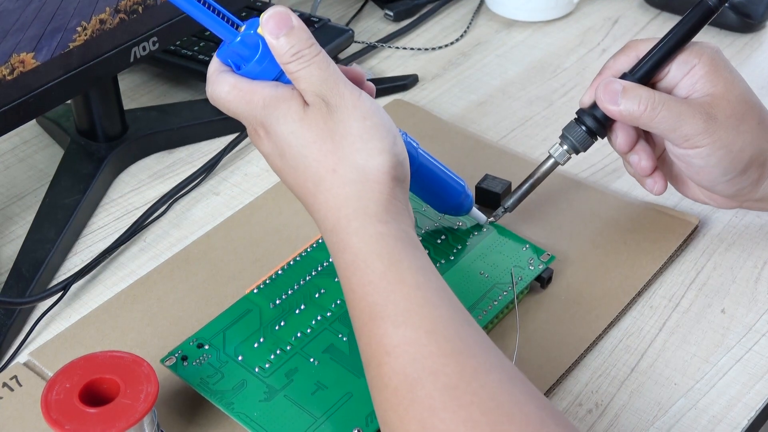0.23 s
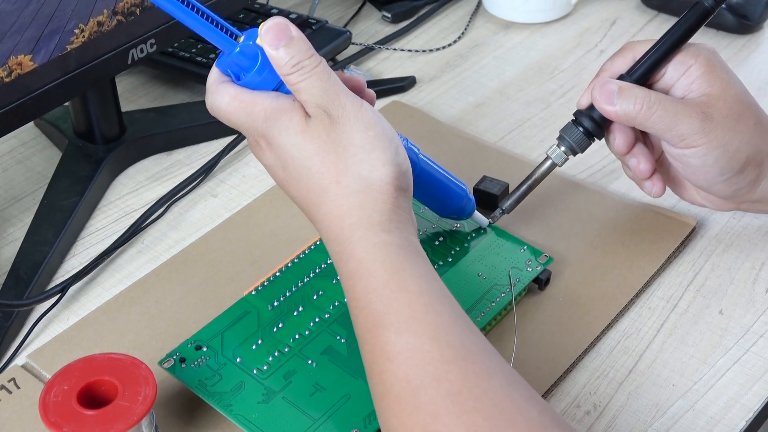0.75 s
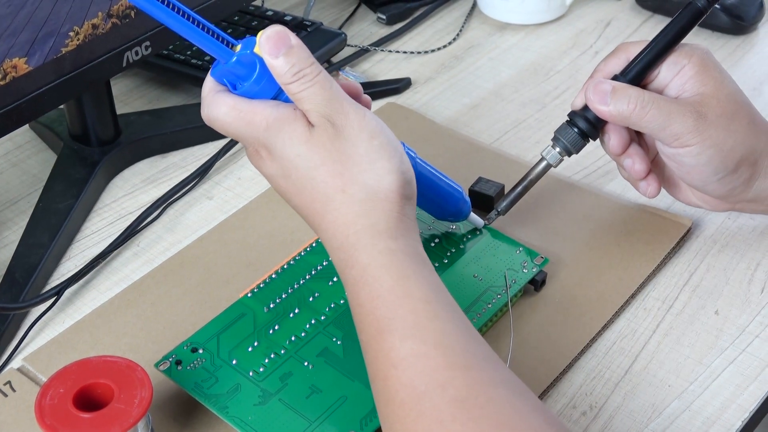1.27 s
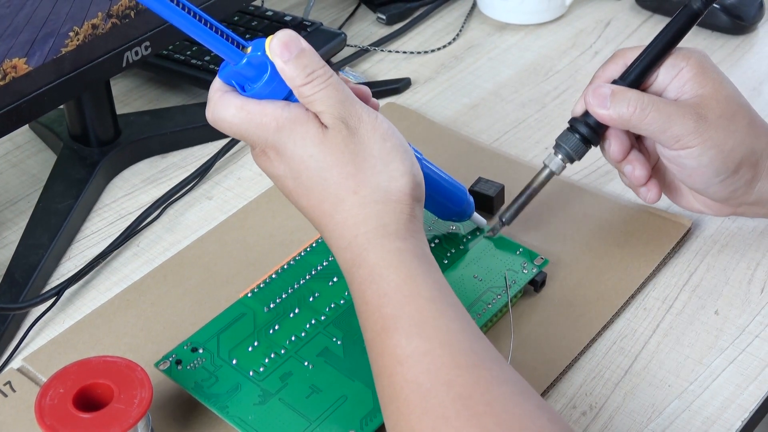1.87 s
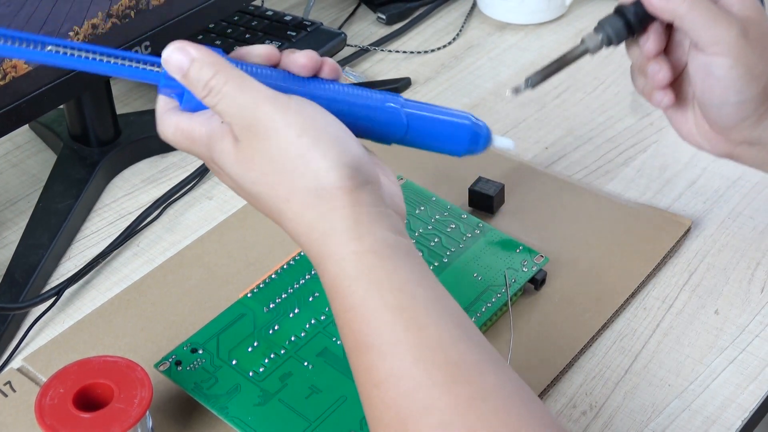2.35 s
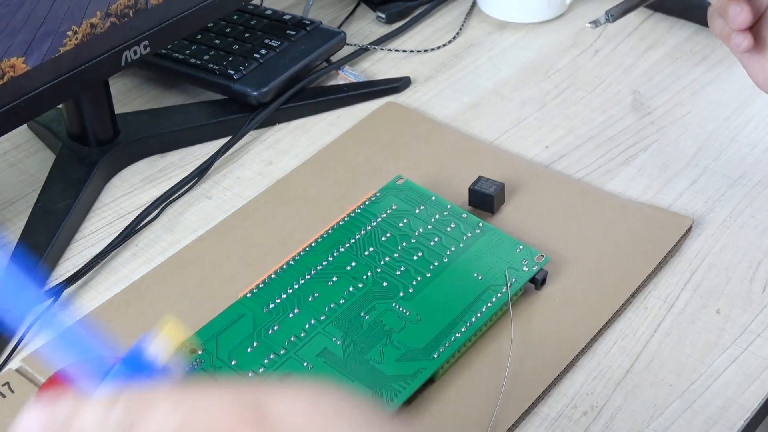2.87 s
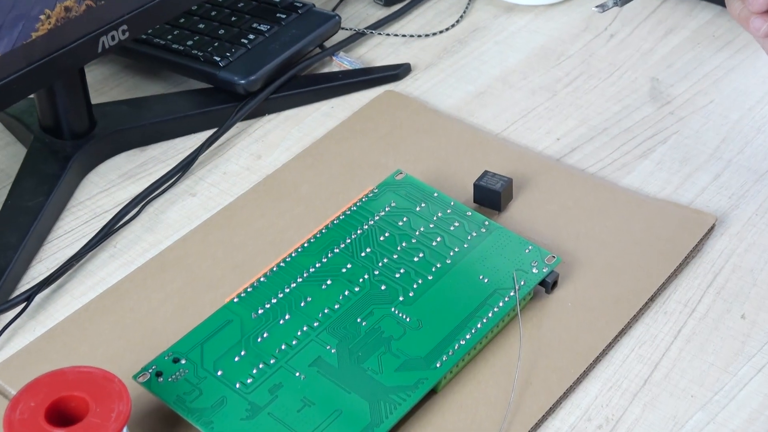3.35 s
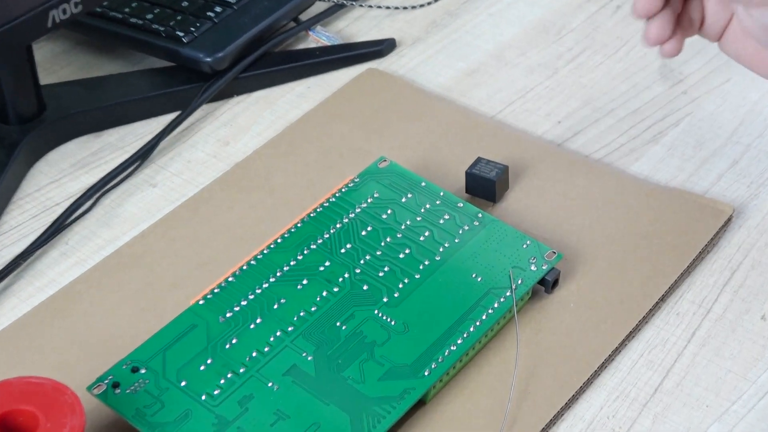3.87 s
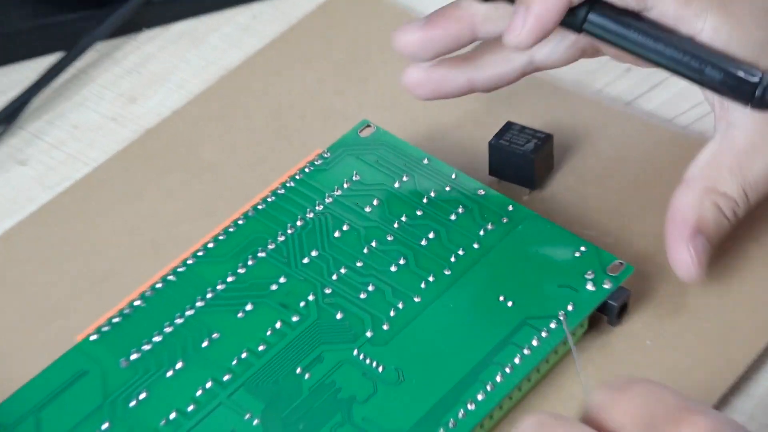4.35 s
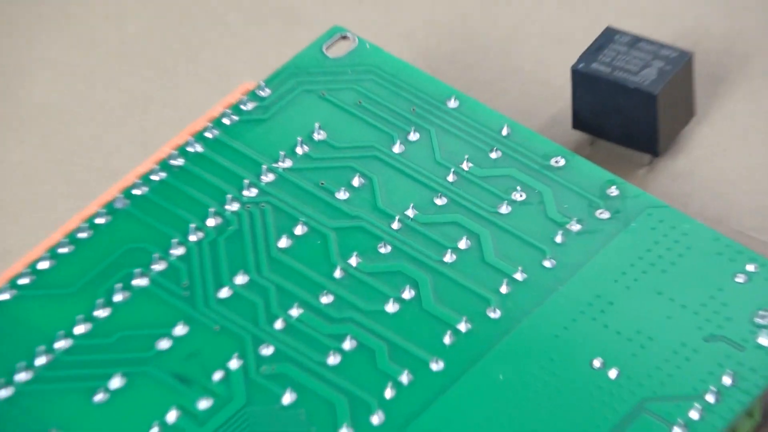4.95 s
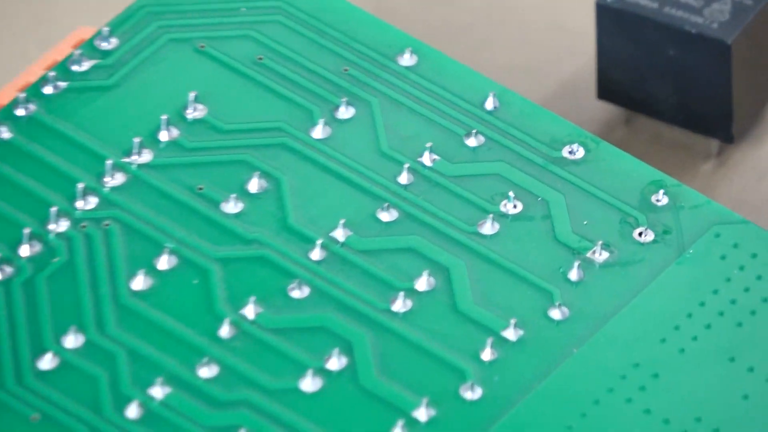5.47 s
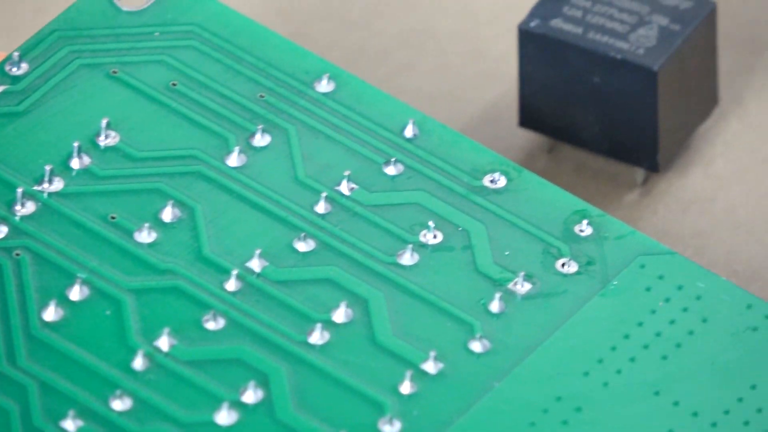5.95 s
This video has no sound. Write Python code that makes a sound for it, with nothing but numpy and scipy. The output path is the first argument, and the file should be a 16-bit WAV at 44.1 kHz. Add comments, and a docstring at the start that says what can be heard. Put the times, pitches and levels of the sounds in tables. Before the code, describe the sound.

A close microphone picks up a workbench in a small, slightly reflective room, with low rumbling air and wavering mains and fan hum throughout. Very soft rubbing passes around 0.3 seconds. At 1.67 a spring-loaded pump's trigger clicks, thin and bright; at 1.89 the plunger fires with a loud, hard snap, several impacts packed together, plastic and spring ringing briefly over a low bench thump. Only hum and a faint low rub near 2.9 follow, with a tiny tick at 3.2. From 3.65 to 4.0 plastic knocks bounce in tight clusters, hollow and woody, with a light jangle. Between 4.45 and 4.87 solder wire slides in a faint grainy hiss with thin squeals and snags, among ticks. Soft handling and small ticks continue. At 5.8 a dull tap precedes a metal tool landing at 5.88 and tipping over at 5.96, clattering briefly; faint rubbing and ticks finish.

```python
"""Desoldering pump on a bench

A spring-loaded pump clicks, then snaps on a circuit board, close by in a small room: noise rattles and struck modes.
It is laid down with bouncing plastic knocks, and a metal tool lands, tips over and clatters to rest.
Solder wire hisses across cardboard with combed noise, squeals and snags; ticks, thuds and soft rubbing join in.
Low bench resonances sway in filtered rumble, under air noise and wavering mains and fan tones."""
import sys
import numpy as np
from scipy import signal
from scipy.fft import rfft, irfft
from scipy.io import wavfile
from scipy.ndimage import uniform_filter1d, map_coordinates

SR = 44100
rng = np.random.default_rng(int(sys.argv[2]) if len(sys.argv) > 2 else 0)


def unload_audio(sound):
    """Save the sound as a 16-bit wav file, at the path given as the first command line argument."""
    columns = np.transpose(np.atleast_2d(sound))
    # keep every value between -1 and 1, then stretch to whole-number steps
    steps = np.round(np.clip(columns, -1, 1) * 32767)
    wavfile.write(sys.argv[1], SR, steps.astype(np.int16))


N = 274346
TIME = np.arange(N) / SR
AGE = TIME[:SR]  # time since a blow [s]

# plastic barrel and spring: (frequency [Hz], level [dB], t60 [s])
PUMP_MODES = [(314.8, -22, 0.38), (365, -15.5, .3), (418, -14.5, 0.19), (464, -12, 0.067),
              (800, -21.5, 0.16), (3617, -20.5, 0.082), (3726, -18, 0.11), (4260, -14.5, 0.0823),
              (6478, -18, .14), (7300, -21.5, .12), (7000, -18.5, .16), (7200, -20.5, .2)]
# plastic knocks on the bench:
# (time [s], level [dB], contact corner [Hz], rattle t60 [s], loss per bounce [dB])
BENCH_BLOWS = [(3.6516, -16.5, 2420, 0.052, 11), (3.689, -22, 2120, 0.046, 9),
               (3.8564, -15.5, 14000, 0.051, 18), (3.868, -16, 3620, 0.048, 5.5),
               (3.9654, -25.5, 1020, 0.074, 7)]
# one pull of the wire
SLIDE_START_S, SLIDE_LENGTH_S = 4.445, 0.42


def amp(db):
    """Decibels to gain."""
    return 10 ** (np.asarray(db) / 20)


def unit(x):
    """Scale to unit energy."""
    return x / np.sqrt(np.sum(x ** 2))


def fade(t60_s):
    """Exponential decay after a blow, 60 dB down at t60_s."""
    return np.exp(-np.log(1000) * AGE / t60_s)


def at(points, hz):
    """Read (Hz, value) points on a log-frequency axis."""
    point_hz, value = np.transpose(points)
    return np.interp(np.log(np.maximum(hz, 1)), np.log(point_hz), value)


def contact(hz, corner_hz):
    """Contact spectrum: a softer blow pushes for longer and loses treble above its corner."""
    return 1 / np.sqrt(1 + (hz / corner_hz) ** 4)


def colour(x, points, corner_hz=np.inf, size=4096):
    """Minimum-phase filter with a (Hz, dB) spectrum; white noise keeps its power."""
    hz = np.arange(size // 2 + 1) * SR / size
    gain = amp(at(points, hz)) * contact(hz, corner_hz)
    cepstrum = irfft(np.log(gain))
    # fold the cepstrum so that the filter is causal
    cepstrum[1:size // 2] *= 2
    cepstrum[size // 2 + 1:] = 0
    response = unit(irfft(np.exp(rfft(cepstrum))))
    return signal.fftconvolve(x, response)[:len(x)]


def hump(hz, skirt_db):
    """Broad spectrum around a centre, skirt_db down two octaves away."""
    below = [(hz / 16, 2 * skirt_db), (hz / 4, skirt_db), (hz / np.sqrt(2), -1)]
    above = [(hz * 4, skirt_db), (hz * 16, 3 * skirt_db)]
    return below + [(hz, 0)] + above


def burst(t60_s):
    """Dying noise rattle of tiny contacts: starts near rms 1, nearly even over frequency."""
    spectrum = rfft(rng.standard_normal(SR) * fade(t60_s))
    even = irfft(spectrum / np.abs(spectrum), SR) * (AGE < t60_s)
    return unit(even) * np.linalg.norm(fade(t60_s))


def tone(hz, t60_s):
    """One struck mode: a decaying sine."""
    return np.sin(2 * np.pi * hz * AGE) * fade(t60_s)


def add(out, start_s, x):
    """Mix x in at start_s."""
    i = int(start_s * SR)
    out[i:i + len(x)] += x[:N - i]


def walk(rate_hz):
    """Slow random drift with a spread near 1."""
    step = int(SR / rate_hz)
    held = np.repeat(rng.standard_normal(N // step + 1), step)
    return uniform_filter1d(held, step)[:N] * np.sqrt(3 / 2)


def line(hz, db, drift_rad=0.56):
    """A hum of rms level db whose phase wanders a little."""
    phase = 2 * np.pi * hz * TIME + drift_rad * walk(5)
    return np.sqrt(2) * amp(db) * np.sin(phase)


def struck(blows, spectrum, modes, ring_db):
    """Each blow rattles the body and rings its modes; harder contacts are brighter."""
    out = np.zeros(N)
    mode_hz, mode_db, _ = np.transpose(modes)
    shapes = np.array([(-1) ** k * unit(tone(hz, t60_s)) for k, (hz, _, t60_s) in enumerate(modes)])
    for start_s, db, corner_hz, t60_s in blows:
        mode_gain = amp(mode_db) * contact(mode_hz, corner_hz)
        ring = np.linalg.norm(fade(t60_s)) * mode_gain @ shapes
        rattle = colour(burst(t60_s), spectrum, corner_hz)
        add(out, start_s, amp(db) * (rattle + amp(ring_db) * ring))
    return out


def bouncing(blows, gap_s, count, shrink=.92, scatter=0.1201):
    """Each blow bounces on, losing level; gaps shrink on the whole, with random scatter."""
    k = np.arange(count)
    contacts = []
    for start_s, db, corner_hz, t60_s, loss_db in blows:
        gaps_s = gap_s * shrink ** k * (1 + scatter * rng.uniform(-0.992, 1, count))
        delays_s = np.cumsum(gaps_s) - gaps_s
        contacts += [(start_s + delays_s[j], db - loss_db * j, corner_hz, t60_s) for j in k]
    return contacts


def tick(db, hz, t60_s):
    """A small contact: a rattle through one broad resonance."""
    return amp(db) * colour(burst(t60_s), hump(hz, skirt_db=-19))


def pump_snap():
    """The plunger's release, flight and stop strike the barrel and spring."""
    # (time [s], level [dB], contact corner [Hz], rattle t60 [s])
    blows = [(1.8805, -30, 7000, 0.068), (1.887, -10, 14500, .065), (1.901, -10.5, 15000, 0.041),
             (1.906, -5.5, 18000, 0.018)]
    # rattle spectrum: (frequency [Hz], level [dB])
    spectrum = [(60, 6.5), (150, 5), (350, 4), (800, 1.5), (1400, 0.5), (2400, -2.5), (3900, 4),
                (5000, -2.5), (6800, 3), (9000, -1.5), (13000, -1), (16000, -5)]
    return struck(blows, spectrum, PUMP_MODES, ring_db=-14.5)


def trigger_click():
    """The trigger lets go of its catch and rings the same pump body."""
    # (time [s], level [dB], contact corner [Hz], rattle t60 [s])
    blows = [(1.6655, -28.5, 15070, 0.034), (1.6672, -12.5, 18170, 0.01), (1.6722, -29, 15000, 0.012)]
    # rattle spectrum: (frequency [Hz], level [dB])
    spectrum = [(100, 4.5), (400, -3), (820, 2.5), (1500, -7), (2600, -5), (3700, -1), (5000, -1),
                (6900, 4), (10000, -1.5), (16000, -4)]
    return struck(blows, spectrum, PUMP_MODES, ring_db=-15)


def bench_knocks():
    """Plastic bounces on the bench and rings its modes."""
    # rattle spectrum: (frequency [Hz], level [dB])
    spectrum = [(80, -5), (250, -6.5), (450, 4), (900, 0.5), (1400, 0.5), (1900, -6.5), (2800, -12),
                (3900, -11), (5300, -19), (9000, -18), (16000, -37)]
    # (frequency [Hz], level [dB], t60 [s])
    modes = [(436, -17, 0.5), (568, -14, .25), (674, -11, 0.16), (730, -13, 0.085), (839, -13.5, 0.18),
             (1076, -23.5, 0.19), (1276, -18.5, 0.25), (1800, -12, 0.066), (2100, -17, 0.18)]
    contacts = bouncing(BENCH_BLOWS, gap_s=.015, count=4)
    return struck(contacts, spectrum, modes, ring_db=-8)


def metal_clatter():
    """A metal tool lands, then tips over; each blow bounces and rings its modes."""
    # (time [s], level [dB], contact corner [Hz], rattle t60 [s], loss per bounce [dB])
    blows = [(5.8787, -17, 9000, 0.092, 3.5), (5.9622, -14.5, 950, 0.038, 16)]
    # rattle spectrum: (frequency [Hz], level [dB])
    spectrum = [(100, 1.5), (350, -11.5), (540, 9), (700, -6), (900, 5), (1250, -9), (2200, -4.5),
                (3500, -15), (4500, -25.5), (5500, -26), (9000, -21.5), (16000, -30)]
    # (frequency [Hz], level [dB], t60 [s])
    modes = [(473, -12, .2), (522, -6, .25), (572, -4, .25), (798, -11, .2), (871, -4, .3), (930, -9, .22),
             (1545, -8, .22), (2213, -19, .3), (2417, -19, .3), (2584, -17, .22), (2682, -16, .3),
             (3246, -19, .2), (3655, -16, .3), (3741, -21, .3), (4404, -16, .09), (4450, -18, .08),
             (5335, -27, .22), (7687, -30, .2), (9141, -30, .25)]
    contacts = bouncing(blows, gap_s=.017, count=5)
    return struck(contacts, spectrum, modes, ring_db=-5.5)


def thuds():
    """Single damped notes of struck surfaces, each eased in over half a cycle."""
    # (time [s], frequency [Hz], level before decay [dB], t60 [s])
    notes = [(1.8912, 810, -0.5, 0.011), (1.892, 99, -12, 0.093), (3.6508, 1000, -3.5, 0.0069),
             (3.694, 435.4, -27, 0.36), (4.472, 944, -19.5, 0.029), (4.834, 3990, -30.5, 0.0076),
             (5.418, 2710, -42.5, 0.19), (5.8035, 142, 0.5, 0.012)]
    out = np.zeros(N)
    for start_s, hz, db, t60_s in notes:
        push = np.sin(np.pi * np.minimum(hz * AGE, .5))
        add(out, start_s, amp(db) * push * tone(hz, t60_s))
    return out


def ticks():
    """Light contacts of plastic, wire and tools, and loose parts jangling after the first knock."""
    # (time [s], level [dB], centre [Hz], t60 [s])
    contacts = [(3.2128, -43.5, 7000, 0.034), (4.3312, -40, 7300, 0.019), (4.4627, -37, 6500, .018),
                (4.489, -29, 1600, 0.031), (4.6476, -40, 6100, 0.037), (4.8566, -34, 3700, 0.0084),
                (4.8981, -33.5, 9300, 0.0048), (5.4193, -41.5, 1660, 0.084), (5.5427, -30, 2900, 0.0094),
                (5.8041, -19, 613, 0.0036), (6.098, -43.5, 8540, 0.016), (6.148, -41.5, 960, .028)]
    out = np.zeros(N)
    for start_s, db, hz, t60_s in contacts:
        add(out, start_s, tick(db, hz, t60_s))
    jangle_delay_s = .0025
    add(out, BENCH_BLOWS[0][0] + jangle_delay_s, tick(db=-23, hz=7730, t60_s=0.07))
    return out


def wire_slide(level_db=-48, growth=0.52, grain_db=3.5, mirror=0.17):
    """Grainy hiss, combed by its bounce off the bench; level, comb and squeals follow wire speed."""
    # hiss spectrum: (frequency [Hz], level [dB])
    spectrum = [(300, 2), (1000, 14.5), (2000, 5), (3000, 2.5), (4400, 5.5), (7000, 4.5), (10000, -2.5),
                (13500, 5), (16000, -5)]
    # thin squeals: (frequency at full speed [Hz], level over the hiss [dB])
    squeals = [(4400, -16), (8400, -13), (12400, -18), (15000, -8), (17500, -12)]
    full_speed_lag_ms, slow_pitch = .64, .65  # slow_pitch: pitch at rest / pitch at full speed
    progress = np.clip((TIME - SLIDE_START_S) / SLIDE_LENGTH_S, 0, 1)
    speed = 4 * progress * (1 - progress)  # arch, peak 1
    pitch = slow_pitch + (1 - slow_pitch) * speed
    grain = amp(grain_db * np.tanh(walk(250)))
    hiss = colour(rng.standard_normal(N) * grain, spectrum)
    lag_s = full_speed_lag_ms / pitch / 1000
    comb = hiss + mirror * map_coordinates(hiss, [(TIME - lag_s) * SR])
    travel_s = np.cumsum(pitch) / SR
    squeal = sum(amp(db) * walk(40) * np.sin(2 * np.pi * hz * travel_s) for hz, db in squeals)
    return (comb / np.std(comb) + squeal) * amp(level_db) * speed ** growth


def wire_snags(count, from_share=.65):
    """The wire catches at random times as it slows."""
    level_db, spread_db = -42, 3
    out = np.zeros(N)
    for place, size in rng.random((count, 2)):
        share = from_share + (1 - from_share) * place
        db = level_db + spread_db * (2 * size - 1)
        add(out, SLIDE_START_S + SLIDE_LENGTH_S * share, tick(db, hz=5500, t60_s=0.0066))
    return out


def shuffles(grain_db=4):
    """Hands, sleeves and tools rub the bench: uneven noise that swells and fades."""
    # (mid time [s], length [s], level [dB], centre [Hz])
    rubs = [(0.32, 0.41, -44, 220), (2.86, 0.074, -33, 59), (3.194, 0.074, -57, 4180),
            (4.39, 0.23, -62, 7400), (4.54, 0.23, -45.5, 840), (4.723, 0.73, -43, 200),
            (5.458, 0.62, -47.5, 272), (5.461, 0.16, -48.5, 1450), (6.178, 0.1, -38.5, 257)]
    out = np.zeros(N)
    for middle_s, length_s, db, hz in rubs:
        swell = np.cos(np.pi * np.clip((TIME - middle_s) / length_s, -.5, .5))
        grip = amp(grain_db * np.tanh(walk(60)))
        out += amp(db) * colour(rng.standard_normal(N) * swell * grip, hump(hz, skirt_db=-19.5))
    return out


def bench_sway(rumble_db=-42):
    """Steady rumble keeps low bench resonances moving; the pump's recoil rocks them."""
    # (time [s], level [dB])
    pushes = [(1.665, -33.5), (1.897, -29)]
    # (frequency [Hz], level [dB], t60 [s])
    modes = [(48.2, 3.5, 1), (58.33, 0.5, 1), (98.6, -7, 0.39)]
    ring = sum((-1) ** k * amp(db) * tone(hz, t60_s) for k, (hz, db, t60_s) in enumerate(modes))
    out = amp(rumble_db) * signal.fftconvolve(rng.standard_normal(N + SR - 1), unit(ring), "valid")
    for start_s, db in pushes:
        add(out, start_s, amp(db) * ring)
    return out


def background():
    """Steady air noise, wavering mains and fan lines, and a fan drone that slowly swells and ebbs."""
    # air spectrum: (frequency [Hz], relative density [dB per Hz])
    spectrum = [(20, -33.5), (33, -6.5), (50, 6.5), (72, 3.5), (105, 0.5), (160, -6), (300, -8),
                (600, -10.5), (1100, -15), (2000, -26), (4000, -34.5), (8000, -38), (16000, -39)]
    # mains and fan lines: (frequency [Hz], rms level [dB], waver [dB])
    lines = [(104, -62, 1.5), (124, -56, 1.5), (284.2, -57, 2.2), (361, -65.5, 1.8), (636, -63, 1.6),
             (14605, -89, 2.3)]
    air = amp(-45) * colour(rng.standard_normal(N), spectrum)
    hum = sum(line(hz, db + waver_db * walk(3.2)) for hz, db, waver_db in lines)
    peak_s, period_s, drone_db, swell_db = .75, 4.7, -56.5, 5.5
    swell = np.cos(2 * np.pi * (TIME - peak_s) / period_s)
    return air + hum + line(201, drone_db + swell_db * swell)


def room(x, early_db=-7, early_t60_s=0.075, late_db=-5, gap_s=0.002):
    """Quick reflections from bench and monitor, then a small room's tail, decaying band by band."""
    # (band centre [Hz], t60 [s])
    decays = [(100, 1), (400, 0.33), (1500, .45), (4000, 0.42), (8000, 0.42), (16000, 0.33)]
    hz = np.arange(SR // 2 + 1)
    noise = rfft(rng.standard_normal(SR))
    tail = 0
    for k, (_, t60_s) in enumerate(decays):
        band = at([(centre_hz, j == k) for j, (centre_hz, _) in enumerate(decays)], hz)
        tail = tail + irfft(noise * band, SR) * fade(t60_s)
    arrived = AGE > gap_s
    early = amp(early_db) * unit(burst(early_t60_s) * arrived)
    late = amp(late_db) * unit(tail * arrived)
    return signal.fftconvolve(x, early + late)[:N]


def scene():
    """Bench sources direct and through the room; sway, rubbing and background direct only."""
    pump = pump_snap() + trigger_click()
    knocks = bench_knocks()
    metal = metal_clatter()
    low = thuds()
    small = ticks() + wire_slide() + wire_snags(count=3)
    room_send = pump + amp(0.5) * knocks + amp(0.5) * metal + amp(-4.0) * small + amp(-15.5) * low
    direct = pump + knocks + metal + small + low
    return (direct + room(room_send) + bench_sway() + shuffles() + background())[None]


def record(dry):
    """The recorder rounds the highest peaks and cuts the top above 16 kHz."""
    rounded = 1.512 * np.tanh(dry / 1.504)
    low_pass = signal.ellip(10, .2, 80, 16000, fs=SR, output="sos")
    return signal.sosfilt(low_pass, rounded)


dry = scene()
out = record(dry)
unload_audio(out)
```